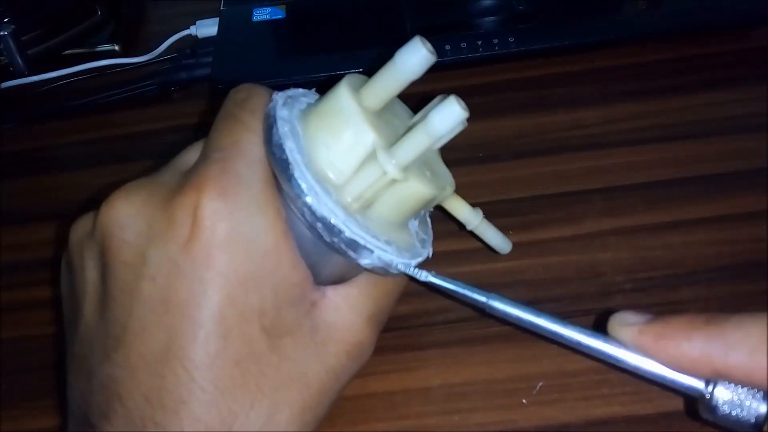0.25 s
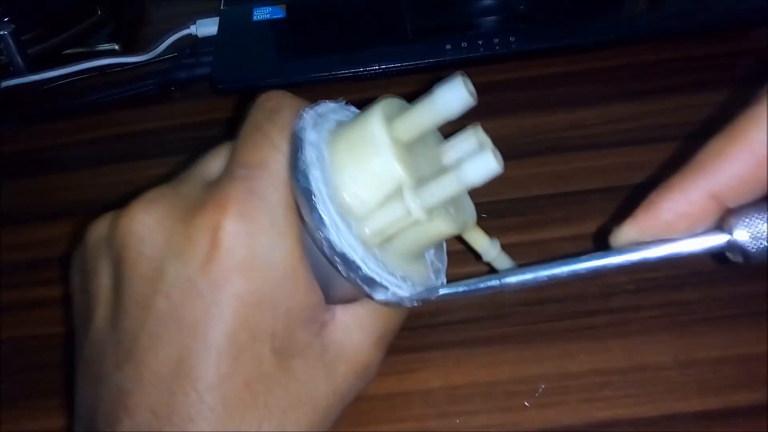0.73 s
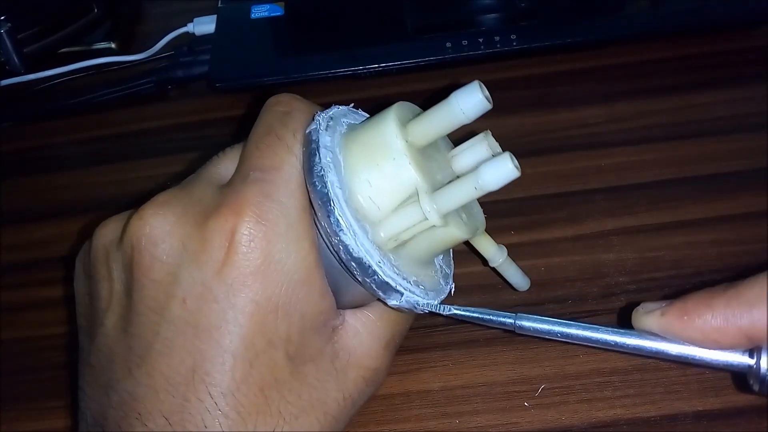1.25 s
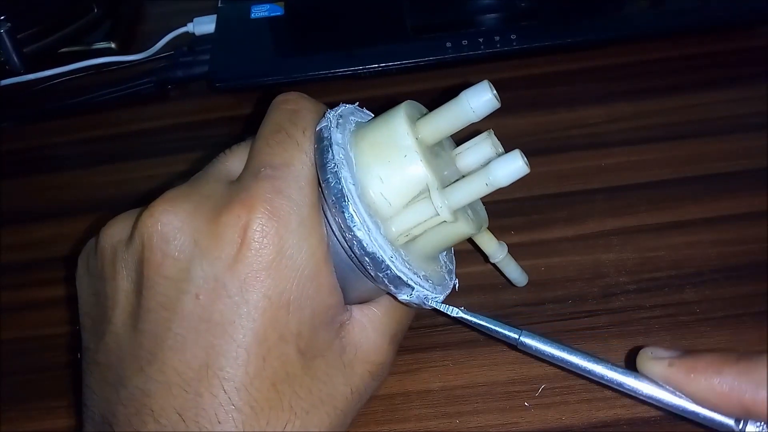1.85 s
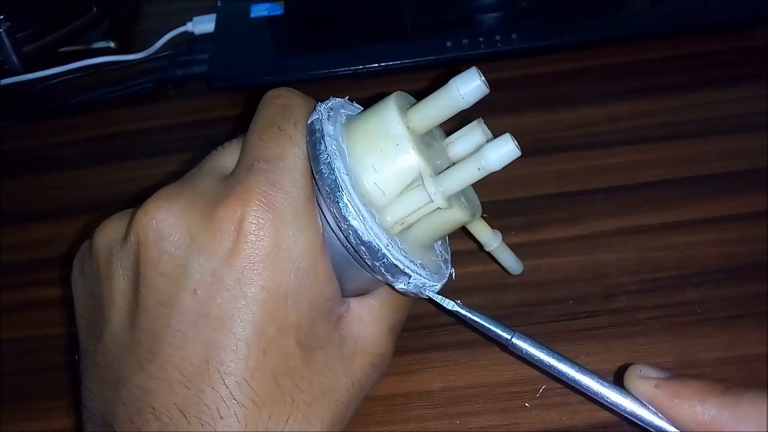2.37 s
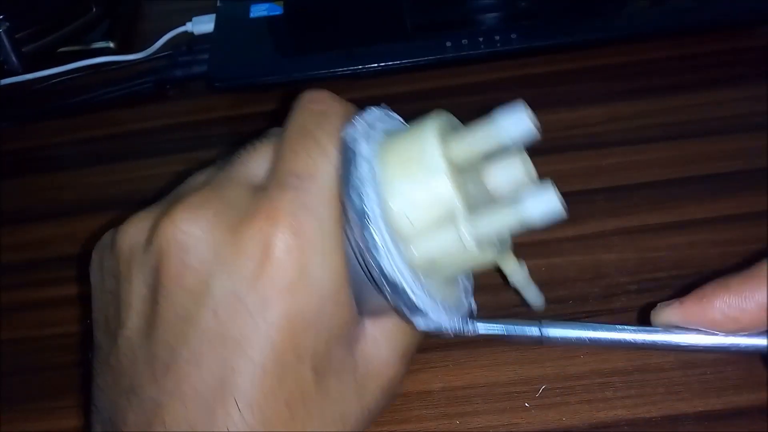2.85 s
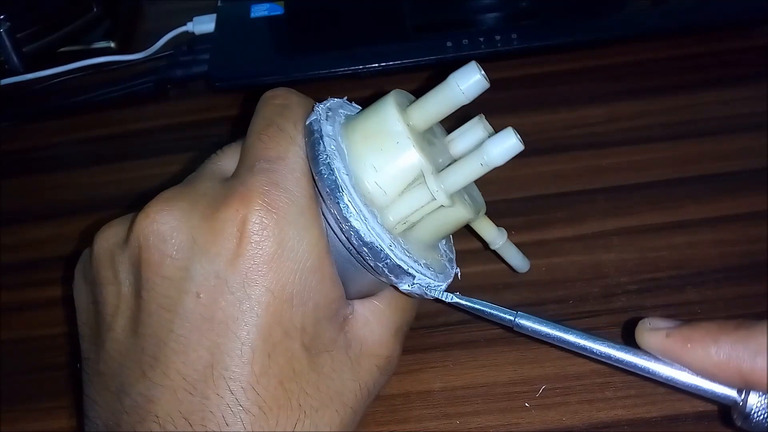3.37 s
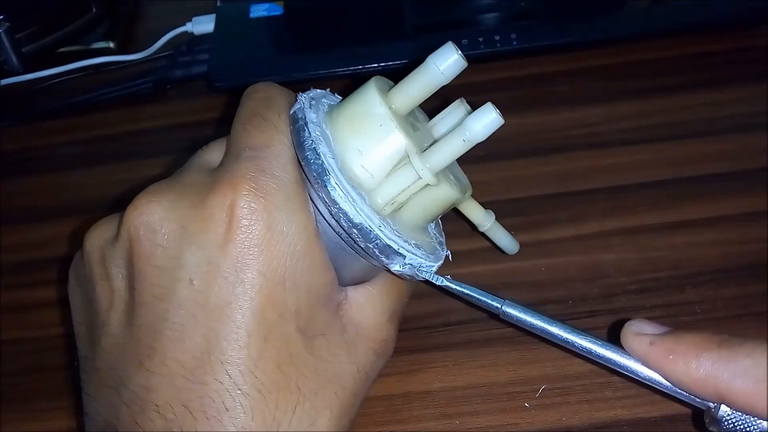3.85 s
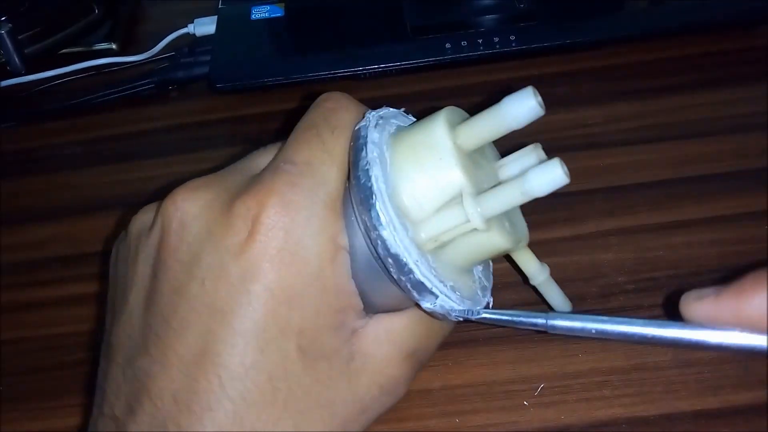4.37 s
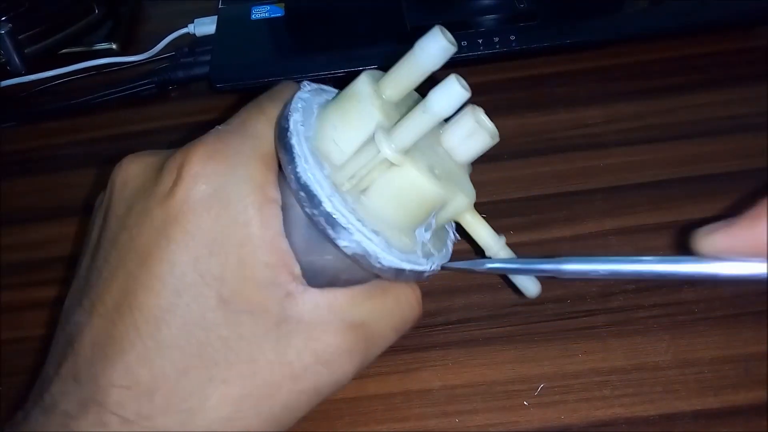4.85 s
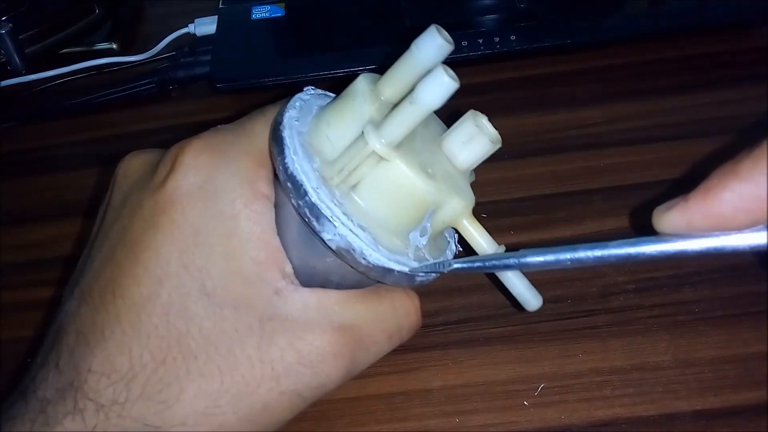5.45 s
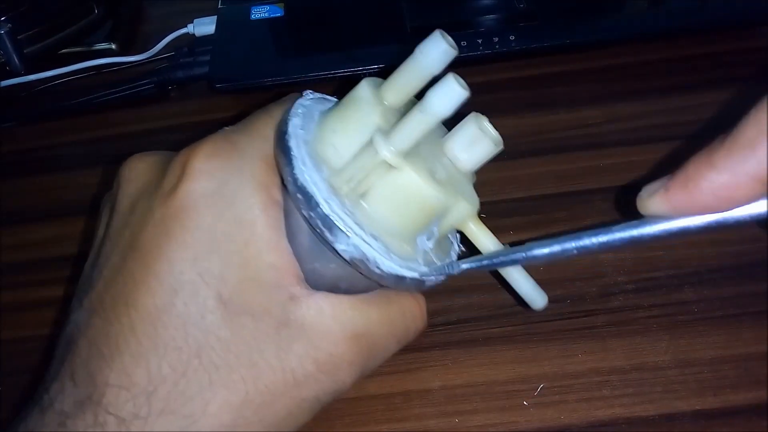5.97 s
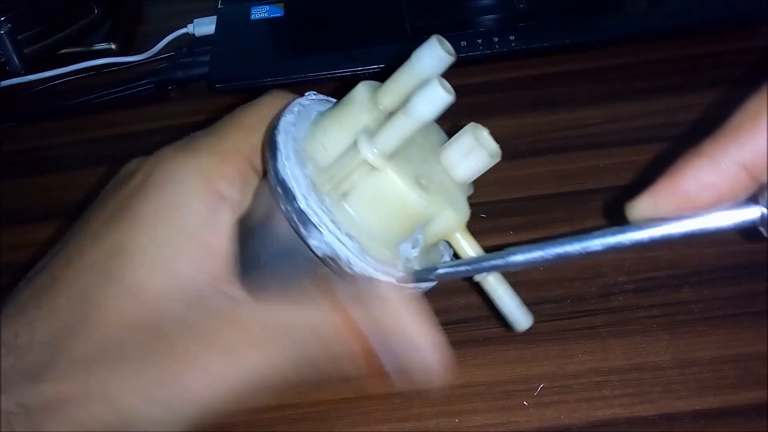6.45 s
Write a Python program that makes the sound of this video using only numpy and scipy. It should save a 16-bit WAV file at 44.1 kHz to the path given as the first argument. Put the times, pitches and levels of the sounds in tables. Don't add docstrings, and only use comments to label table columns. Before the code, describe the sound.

A screwdriver pries at a metal rim above a wooden desk, heard very close in stereo in a small room. Faint rubbing and a thin creak open, then scattered sharp ticks, the brightest with a short metallic ring midway. Afterwards heavy, boomy forearm knocks shake the desk, gritty scuffs follow, and a final dull thump closes over quiet hiss.

```python
import sys
import numpy as np
from scipy import signal
from scipy.fft import rfft, irfft
from scipy.io import wavfile
from scipy.ndimage import uniform_filter1d

SR = 44100
rng = np.random.default_rng(int(sys.argv[2]) if len(sys.argv) > 2 else 0)


def log_audio(samples):
    frames = np.atleast_2d(samples).T
    limited = np.clip(frames, -1, 1)
    pcm = np.round(limited * 32767).astype(np.int16)
    wavfile.write(sys.argv[1], SR, pcm)


def nominal_scale(level):
    x = np.asarray(level, float) / 20
    return 10 ** x


N = 295934


def ticks():
    # start_s, peak_db, top_db, left_minus_right_db, cut_of_dull_part_db
    tick_table = [(0.0128, -46.5, -17, 24, 18), (0.2199, -38.5, -11, 13.5, 7.5), (0.352, -56, -27, 22, 8),
                  (0.8606, -56.5, -39, 22, 11), (1.225, -62, -32, 9.5, -8), (1.3647, -72, -36, 26, 7),
                  (2.368, -21, -17.5, 7.5, 1), (2.639, -65, -28, 12, 5), (2.986, -43, -23, 15.5, 26),
                  (3.5767, -53.5, -45.5, 13.5, 3), (3.798, -32, -14, 17.5, 4.5), (4.212, -34, -6, 12.5, -5),
                  (5.2286, -52.5, -44, 8, 4), (5.4115, -56.5, -22, 14, -3), (5.5252, -73.5, -26, 8, -23),
                  (5.5969, -54, -38, 15, -2), (5.917, -62.5, -43, 17.5, 2)]
    # pitch_hz, level_db, time_to_fall_60_db_s
    shaft_modes = [(1702, -0.5, 0.12), (1770, -18, .05), (2176, -16, 0.088)]
    # frequency_hz, level_db (per Hz)
    crack_tone = [(1120, -36.5), (1900, -2), (2160, -10.5), (3190, -4.5), (3430, -4.5), (4080, -0.5),
                  (5370, -5), (5800, -1.5), (6510, 6), (7450, -1.5), (8800, -23.5), (11400, -71),
                  (19400, -120)]
    # start_s, peak_db, pitch_hz,
    # time_to_fall_60_db_s, left_minus_right_db
    ping_table = [(.22, -55.5, 4070, 0.013, -7), (1.225, -72, 2330, .03, -8), (2.37, -48, 3930, 0.024, -3),
                  (2.371, -60, 4010, .09, -3), (3.799, -60.5, 4026, .07, 0), (3.07, -70, 1850, .06, -2),
                  (3.095, -73, 1750, 0.11, -1), (3.66, -68.5, 507.6, 0.081, 2),
                  (4.804, -45, 4450, 0.008, -11.5), (5.072, -60, 3480, 0.0079, -21.5),
                  (5.229, -48.5, 3420, 0.01, 4), (5.411, -60.5, 3060, 0.012, -4),
                  (5.405, -73, 1694, 0.13, -1), (5.525, -60.5, 2660, .025, -4)]
    shaft_level_db, swing_db = -32, -40
    dull, bright, top, shaft = np.zeros((4, 2, N + SR))
    t = np.arange(int(0.08 * SR)) / SR
    swing = ring(shaft_modes, length=0.3)
    swing = swing * (1 - np.exp(-np.arange(len(swing)) / (0.0013 * SR)))
    noises = rng.standard_normal((len(tick_table), 2, len(t)))
    for (s, db, top_db, pan_db, dull_db), noise in zip(tick_table, noises):
        chatter = noise * nominal_scale(-13.5 - 60 * t / 0.015)
        chatter[:, 0] = 1
        add(dull, s + 0.001242, chatter, db + 18 - dull_db, 0.18 * pan_db)
        add(bright, s + 0.001059, chatter, db + 18.5, pan_db)
        add(top, s + 0.001, chatter, db + top_db + 12, 0.3 * pan_db)
        weak_db = -30 * (db < swing_db)
        add(shaft, s + 0.00076, swing, db + shaft_level_db + 14 + weak_db, 0)
    crack = colour(band(dull, 1400, 4900) - band(bright, 4900, 8100), crack_tone)
    crack = crack + band(top, 8100, 17000)
    ringing = shaft[:, :N] + rings(ping_table, swell=0.04)
    return fold(crack[:, :N], room(wet_db=-23)) + fold(ringing, room(wet_db=-23.5))


def knocks():
    # start_s, peak_db, contact_ms, deep_modes_db, slap_db
    knock_table = [(0.73, -49, 0.3, -16, -29), (0.915, -66, 0.091, -9, -27), (2.384, -47, 0.14, -1, 1),
                   (2.819, -53.5, 0.15, -9, -8), (3.211, -11.5, 0.07, 5.5, -18.5),
                   (4.145, -30, 0.18, 7.5, -35.5), (4.259, -15.5, 0.089, 3, -11.5),
                   (5.057, -20.5, 0.12, 1, -26), (5.209, -18.5, 0.17, 6.5, -37),
                   (6.568, -60.5, 0.061, 7, -9), (6.661, -32, 0.18, 11.5, -24)]
    # pitch_hz, level_db, time_to_fall_60_db_s
    desk_modes = [(82, -15, .3), (108.6, -2.5, 0.31), (152.3, 3, 0.21), (257, -19, 0.057),
                  (269, -4.5, 0.31), (364, -10, .1), (406, -24, .12), (503, -15.5, 0.22),
                  (502.5, -2, 0.069), (655, -22, 0.078), (793, -9, .08), (1020, -14.5, 0.011)]
    # frequency_hz, level_db (per Hz)
    thud_tone = [(24, -48), (40, -5), (490, -3.5), (735, -5.5), (1000, -5), (2200, -11), (3230, -16),
                 (4620, -27), (6610, -23), (12000, -81), (15600, -115), (22000, -120)]
    pan_db = 0.65
    push, board, slap = np.zeros((3, 2, N + SR))
    t_ms = np.arange(1200) * 1000 / SR
    spots = rng.standard_normal((len(knock_table), len(desk_modes)))
    skin = rng.standard_normal((len(knock_table), 2, len(t_ms)))
    for (s, db, contact_ms, deep_db, slap_db), spot, noise in zip(knock_table, spots, skin):
        shape = t_ms ** 3 * np.exp(-2 * t_ms / max(contact_ms, 0.02))
        add(push, s + 0.0045, -shape / shape.sum(), db + 32.0, pan_db)
        modes = [(hz * (1 + 0.0033 * r), g + 1.1 * r, t60) for (hz, g, t60), r in zip(desk_modes, spot)]
        high, deep = ring(modes[5:]), ring(modes[:5])
        deep = deep * (1 - np.exp(-np.arange(len(deep)) / (0.035 * SR)))
        add(board, s + 0.004632, high + nominal_scale(deep_db - 0.5) * deep, db - 6.5, pan_db)
        add(slap, s + 0.0043, noise * nominal_scale(-60 * t_ms / 8), db + slap_db - 0.5, pan_db)
    sharp = colour(push, thud_tone) + band(slap, 2600, 7600)
    heard = fold(sharp[:, :N], room(wet_db=-23.0)) + fold(board[:, :N], room(wet_db=-23.5))
    return band(band(heard, 72, 7800), 30, 7800)


def rubs():
    # start_s, length_s, level_db, weight_db, speed_db
    rub_table = [(0, 0.076, -44.5, -1.5, -1), (0.106, 0.057, -54.5, 2, -4), (0.671, 0.027, -47.5, -1.5, -1),
                 (.72, 0.034, -50.5, 4, -7), (0.806, 0.071, -60, 9, -2.5), (0.907, 0.048, -60, 8.5, -4),
                 (2.754, 0.037, -56, -6, -5), (2.772, 0.07, -57.5, 3.5, 3), (3.2, .015, -55, -4, 6),
                 (4.358, .04, -44, -2, -1.5), (4.409, 0.028, -46, 3, 8.5), (4.455, 0.13, -44.5, 3.5, 0),
                 (4.649, .035, -55, 4.5, 4.5), (4.708, 0.1, -63, -3, 6.5), (4.778, 0.098, -37, -13.5, 1),
                 (4.898, 0.036, -45.5, -3, -17), (4.942, 0.036, -43.5, -17, 7.5),
                 (5.541, 0.054, -66.5, 10.5, -10), (5.59, 0.042, -62.5, 1, -2),
                 (6.564, .07, -65.5, -4, 5.5), (6.634, 0.053, -53, 8.5, 5.5)]
    # start_s, length_s, level_db
    shift_table = [(0.202, .03, -59), (0.252, 0.086, -65.5), (0.333, 0.024, -60.5), (.38, 0.103, -74.5),
                   (0.608, 0.066, -64), (0.964, 0.024, -71.5), (1.048, .28, -70), (2.875, 0.24, -75),
                   (6.156, 0.14, -75)]
    # frequency_hz, level_db (per Hz)
    rub_tone = [(24, -59.5), (40, -41), (116, -9.5), (209, -15), (275, -13.5), (307, -3.5), (369, -4),
                (711, -15), (1570, -30), (6120, -34), (9000, -71), (11700, -77), (19800, -120)]
    # pitch_hz, level_db, time_to_fall_60_db_s
    cloth_modes = [(264.9, 2.5, 0.077), (388, -10.5, 0.048), (545.7, -3, 0.089), (950, -4, 0.016),
                   (1190, -12.5, .04), (1720, -1.5, 0.075), (1980, -1.5, .03), (3400, -19.5, .015),
                   (4310, -12.5, .015)]
    # pitch_hz, level_db, time_to_fall_60_db_s
    frame_modes = [(84, -15, 0.059), (110, -4.5, 0.6), (159.4, 0, 0.36)]
    lumpy_db, grain_db, grit_fall_db_s = 2.4, 5, 902.5
    grit_db, rustle_db, rustle_per_speed = -6.5, -16, 1.2
    grain_level = nominal_scale(np.minimum(grain_db * rng.exponential(size=N), 13))
    grains = (rng.random(N) < 500 / SR) * rng.choice([-1, 1], N) * grain_level
    slip = (level(grains, 1.3) + rng.standard_normal(N)) * nominal_scale(lumpy_db * walk(90))
    board = colour(slip + nominal_scale(-25.0) * fold(slip, ring(cloth_modes, length=0.27))[0], rub_tone)
    strokes = np.array(rub_table + [row + (0, 0) for row in shift_table], float)
    weight, speed = strokes[:, 3], strokes[:, 4]
    boom = level(band(fold(slip, ring(frame_modes)), 60, 200), -4) * played(strokes, weight)
    body = level(band(board, 200, 900), -4) * played(strokes)
    grit = level(band(board, 900, 2600), -3) * played(strokes, grit_db + speed, grit_fall_db_s)
    rustle = played(strokes, rustle_db + rustle_per_speed * speed, grit_fall_db_s)
    hiss = level(band(board, 2600, 12000), -2) * rustle
    return np.repeat(boom + body + grit + hiss, 2, axis=0)


def skids():
    # start_s, level_db, length_s, low_hz, top_hz
    skid_table = [(0, -59, 0.14, 3550, 4700), (0, -57.5, 0.083, 1450, 2520), (0.676, -55, 0.038, 890, 2600),
                  (0.841, -72, 0.17, 1420, 2090), (4.419, -42.5, 0.022, 898, 5000),
                  (4.467, -51, 0.086, 695, 2500), (4.785, -46, 0.061, 1230, 6500),
                  (4.824, -48, 0.067, 1300, 4200), (4.94, -56, 0.044, 900, 6500),
                  (6.563, -55.5, 0.036, 6200, 7300), (0.087, -63, 0.038, 1780, 1940),
                  (4.969, -52, 0.024, 1000, 6500), (6.64, -57, 0.024, 660, 2000)]
    out = np.zeros((2, N + SR))
    chances = rng.random((len(skid_table), 2, SR // 4))
    for (s, db, length, low_hz, top_hz), chance in zip(skid_table, chances):
        clicks = (chance[0] < 1500 / SR) * (chance[1] - 0.5)
        clicks = clicks[:int(length * SR)]
        grit = colour(band(clicks, low_hz, top_hz), [(900, 3), (1800, 7.5), (3000, -5.0), (7000, -18)])
        add(out, s, level(grit, 0) * np.sqrt(signal.windows.hann(len(clicks))), db, 0)
    return out[:, :N]


def creak():
    # start_s, length_s, level_db, first_hz, last_hz
    creak_table = [
        (0, 0.098, -54.5, 1600, 1540),
        (.115, 0.079, -67.5, 1540, 1500),
        (0.219, 0.028, -59.5, 1540, 1500),
        (0.293, .06, -61.5, 1480, 1430),
        (0.359, 0.058, -78, 1350, 1242),
        (.85, .34, -80, 1520, 1430),
    ]
    flutter_db = 3
    t = np.arange(N) / SR
    s, length, _, first, last = np.transpose(creak_table)
    hz = np.interp(t, np.ravel([s, s + length], "F"), np.ravel([first, last], "F"))
    wavering_hz = hz * (1 + 0.0453 * walk(260))
    tone = np.sin(2 * np.pi * np.cumsum(wavering_hz) / SR) * nominal_scale(flutter_db * walk(44.6))
    return tone * played(creak_table) * np.ones((2, 1))


def stand():
    # start_s, peak_db, pitch_hz, time_to_fall_60_db_s, left_minus_right_db
    bump_table = [
        (.357, -47, 142, 0.094, 16),
        (.372, -58, 110, 0.059, 21),
        (.438, -59.5, 134, 0.061, 25.5),
    ]
    # start_s, length_s, rumble_db
    sway_table = [
        (0, 0.049, -49.5),
        (.31, .1, -62),
        (.43, 0.037, -61.5),
    ]
    rumble = level(band(rng.standard_normal(N), 40, 100), 0) * played(sway_table)
    return rings(bump_table, swell=0.15) + rumble * nominal_scale(np.array([[3], [-4]]))


def floor():
    # frequency_hz, level_db (per Hz)
    air_tone = [(25, -16.5), (100, -2.5), (250, -8), (600, -14), (1500, -17), (5800, -17), (8200, -31.5),
                (14800, -29), (16000, -63.5)]
    # frequency_hz, level_db (per Hz)
    hiss_tone = [(4600, -41.5), (5200, -10.5), (5900, -3.5), (6500, -8), (7100, 2), (7400, -2.5),
                 (7800, -14.5), (8300, -24), (8600, -83)]
    air_db, hiss_db, swell_db = -71, -64.5, 1.5
    noise = rng.standard_normal((4, N))
    bass = signal.sosfilt(signal.butter(1, 400, fs=SR, output="sos"), noise[2])
    apart = noise[:2] * nominal_scale(0.91 * walk(2.5))
    shared = 1.1 * bass * nominal_scale(swell_db * walk(2.9))
    air = level(colour(apart + shared, air_tone), air_db)
    crackle = (rng.random(N) < 60 / SR) * nominal_scale(15 + np.minimum(2.5 * rng.exponential(size=N), 5))
    flutter = nominal_scale(2.78 * walk(150) + 0.8 * walk(1.4))
    hiss = level(colour(noise[3] * flutter + crackle, hiss_tone), hiss_db)
    return air + hiss * nominal_scale(np.array([[0], [-28]]))


def room(wet_db, rise_s=0.0006, lag=5):
    # frequency_hz, time_to_fall_60_db_s, level_db
    echo_table = [(60, 0.98, -27), (245.6, 0.38, -9.5), (1000, 0.52, -19.5), (4230, 0.29, -16.5),
                  (6500, 0.63, -24.5), (12200, 0.4, -24.5)]
    # frequency_hz, correlation (0 to 1)
    alike_table = [(60, 0.8), (290, 0.88), (640, 0.48), (1400, 0.067), (5000, .05)]
    t = np.arange(int(0.8 * SR)) / SR
    tail = 0
    for hz in 64 * 2 ** np.arange(0, 8, 0.5):
        sos = signal.butter(2, [hz / 1.19, hz * 1.19], "band", fs=SR, output="sos")
        alike = np.clip(bend(alike_table, hz), 0, 1)
        noise = signal.sosfilt(sos, rng.standard_normal((2, len(t))))
        mid, side = noise * np.sqrt([[1 + alike], [1 - alike]])
        fade = nominal_scale(bend(echo_table, hz, order=2) - 60 * t / bend(echo_table, hz))
        tail = tail + fade * np.array([mid + side, mid - side])
    tail = tail * (1 - np.exp(-t / rise_s)) * nominal_scale(wet_db)
    tail[[0, 1], [0, int(lag)]] += 1
    return tail


def ring(modes, length=0.43):
    t = np.arange(int(length * SR)) / SR
    y = sum(nominal_scale(db) * np.sin(2 * np.pi * hz * t) * nominal_scale(-60 * t / t60) for hz, db, t60 in modes)
    return y / np.abs(y).max()


def rings(table, swell):
    out = np.zeros((2, N + SR))
    for s, db, hz, t60, pan_db in table:
        shape = ring([(hz, 0, t60)], length=0.3)
        rise = 1 - np.exp(-np.arange(len(shape)) / (SR * swell * t60))
        add(out, s, shape * rise, db + 10.5, pan_db)
    return out[:, :N]


def played(rows, more_db=0, fall_db_s=498.5):
    rise_s = 0.012
    t = np.arange(0, N + 32, 32) / SR
    s, length, db = np.array(rows, float).T[:3, :, None]
    already_on = s < 0.005
    rise = np.clip((t - s) / rise_s + 0.5 + already_on, 0, 1) ** 2
    fall = -fall_db_s * np.maximum(t - s - length, 0)
    each = rise * nominal_scale(db + np.reshape(more_db, (-1, 1)) + fall)
    gain = np.sqrt(np.sum(each ** 2, axis=0))
    return np.interp(np.arange(N) / SR, t, gain)


def walk(rate):
    k = int(SR / rate)
    held = np.repeat(rng.standard_normal(N // k + 1), k)
    return uniform_filter1d(held, k)[:N]


def add(track, s, shape, db, pan_db):
    at = int(s * SR)
    track[:, at:at + np.shape(shape)[-1]] += shape * nominal_scale(db + np.array([[pan_db], [-pan_db]]) / 2)


def bend(table, hz, order=1):
    table = np.array(table, float)
    return np.interp(np.log(np.maximum(hz, 1)), np.log(table[:, 0]), table[:, order])


def colour(x, table, size=4096):
    cep = irfft(np.log(nominal_scale(bend(table, np.fft.rfftfreq(size, 1 / SR)))))
    cep[1:size // 2] *= 2
    cep[size // 2 + 1:] = 0
    return fold(x, irfft(np.exp(rfft(cep))))


def fold(x, response):
    return signal.fftconvolve(*np.atleast_2d(x, response), axes=1)[:, :np.shape(x)[-1]]


def band(x, low_hz, high_hz):
    return signal.sosfilt(signal.butter(3, [low_hz, high_hz], "band", fs=SR, output="sos"), x)


def level(x, db):
    return x * nominal_scale(db) / np.sqrt(np.mean(x ** 2))


def scene():
    soft = fold(rubs() + creak() + skids(), room(wet_db=-23.5))
    return knocks() + soft + ticks() + stand() + floor()


def band_limit(x):
    return signal.sosfilt(signal.butter(12, 16390, fs=SR, output="sos"), x)


def record(dry):
    mix = signal.sosfilt(signal.ellip(6, 0.3, 40, 15000, fs=SR, output="sos"), dry)
    return band_limit(mix)


dry = scene()
out = record(dry)
log_audio(out)
```